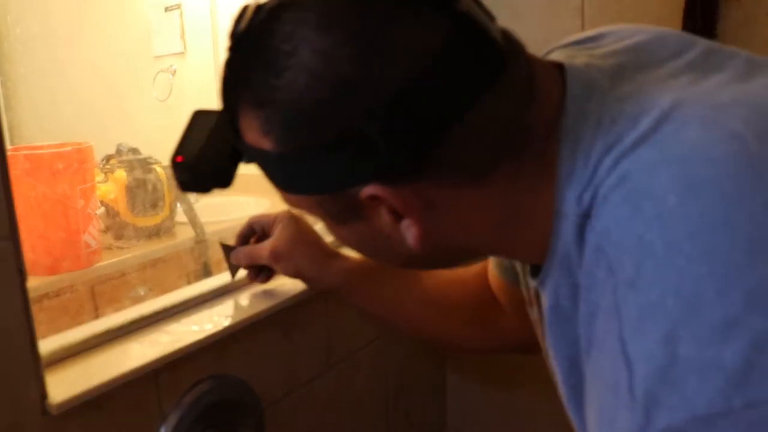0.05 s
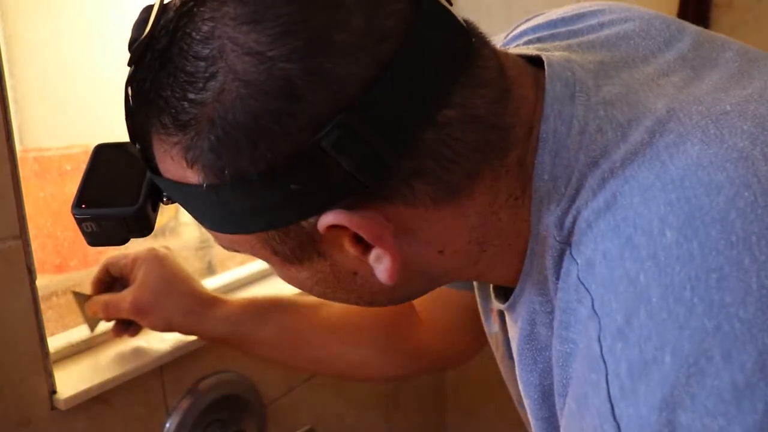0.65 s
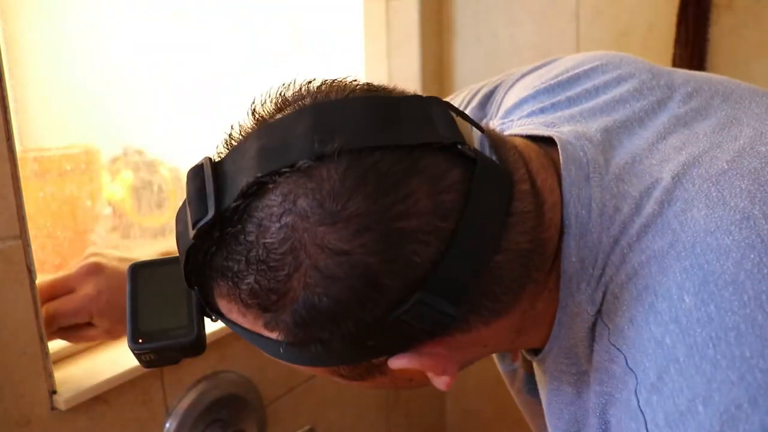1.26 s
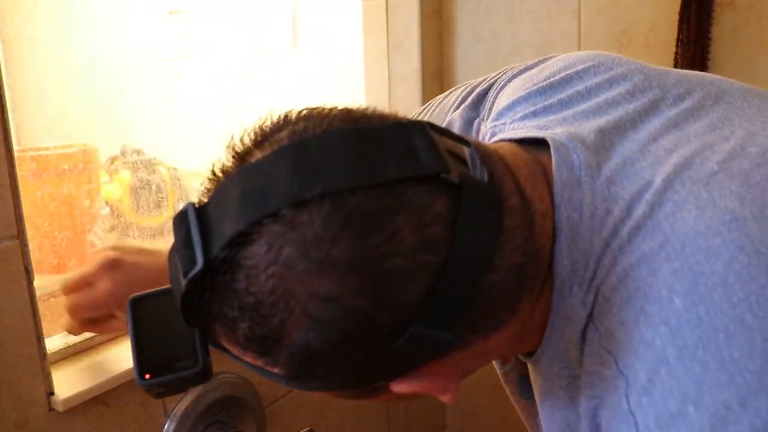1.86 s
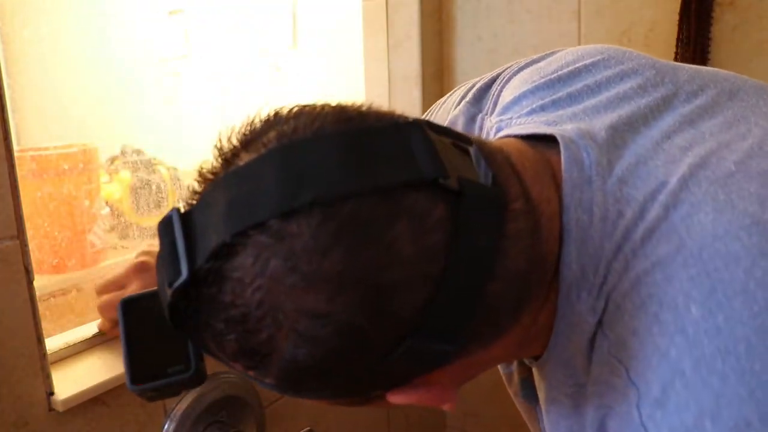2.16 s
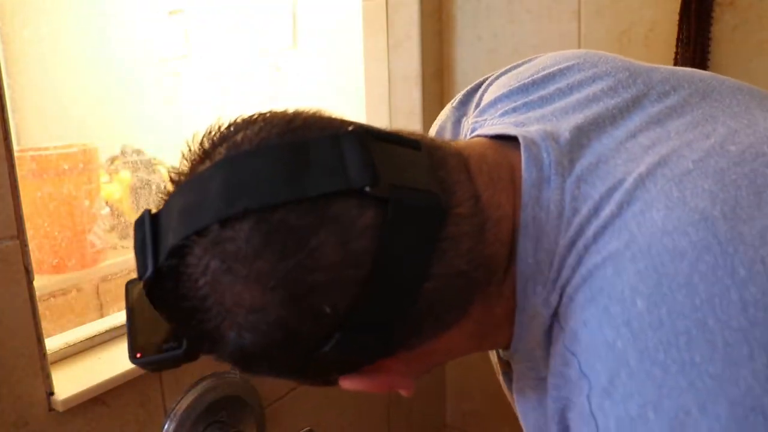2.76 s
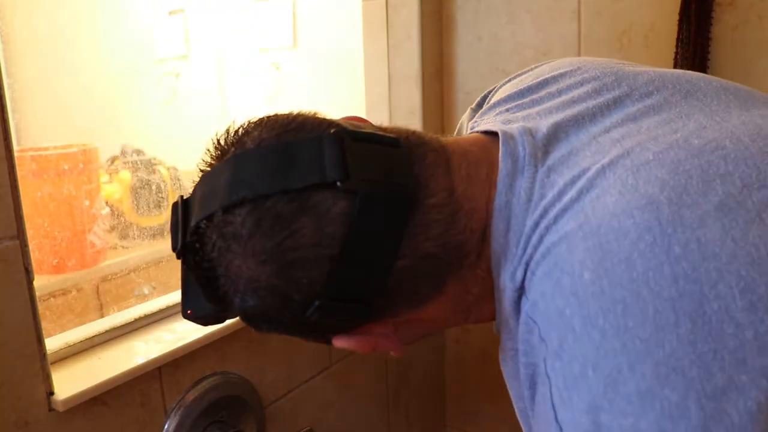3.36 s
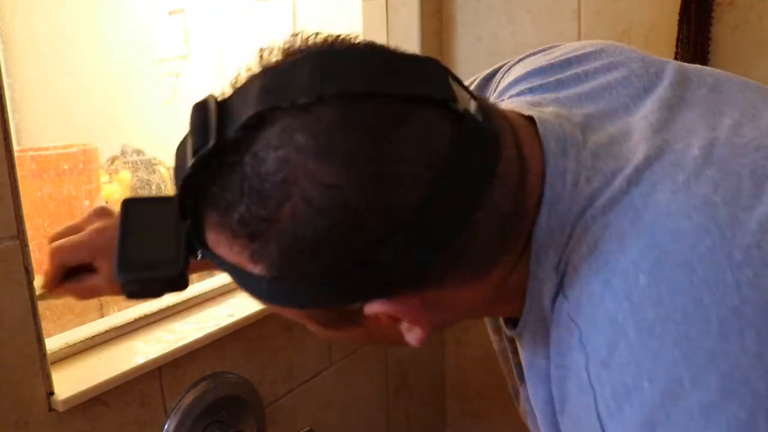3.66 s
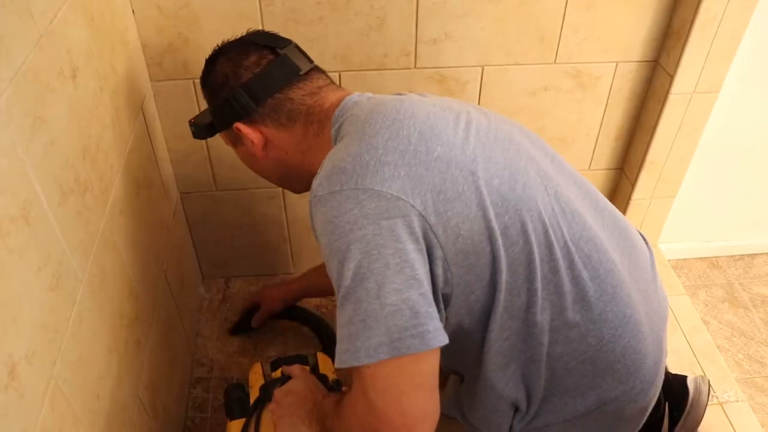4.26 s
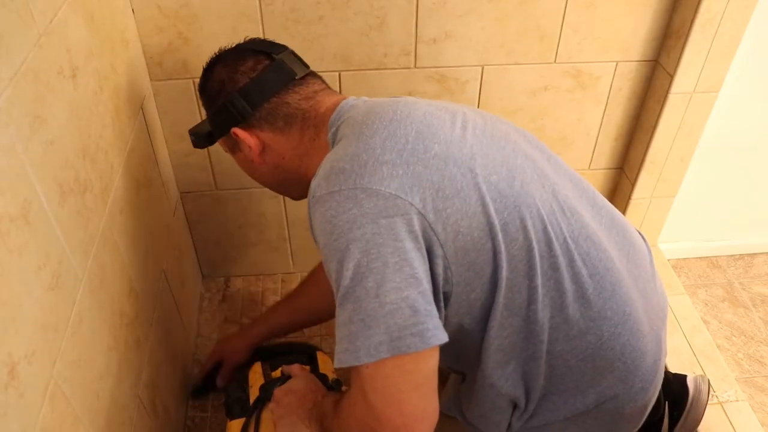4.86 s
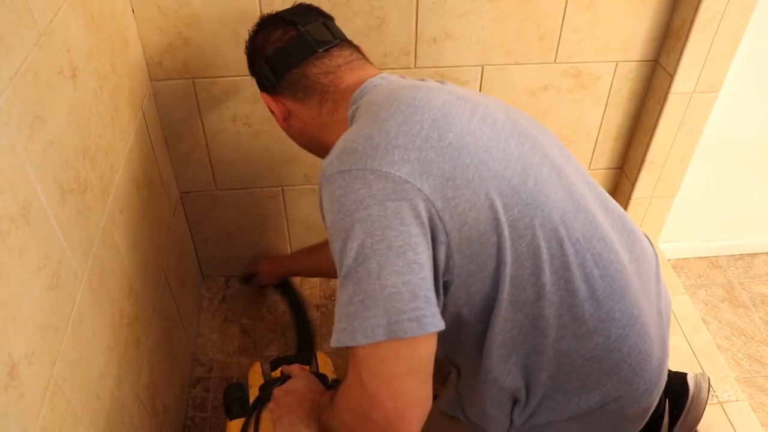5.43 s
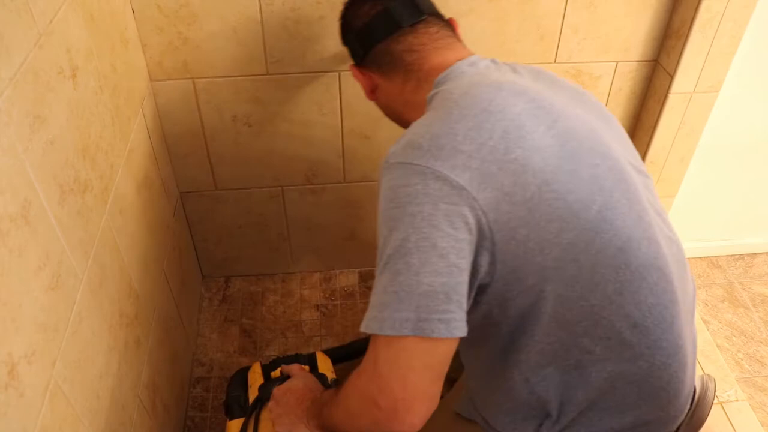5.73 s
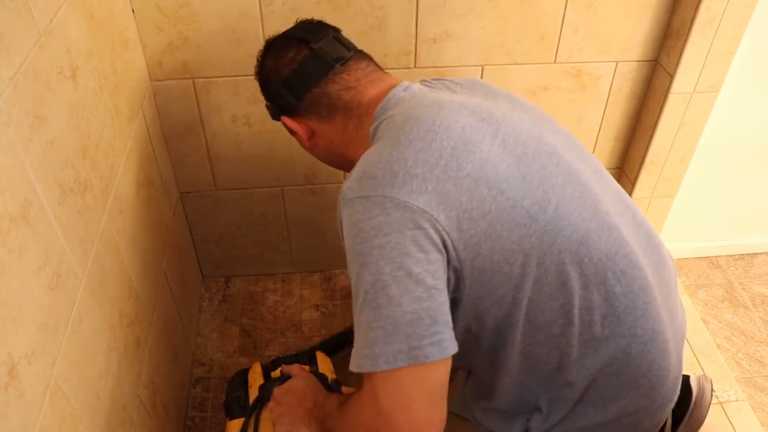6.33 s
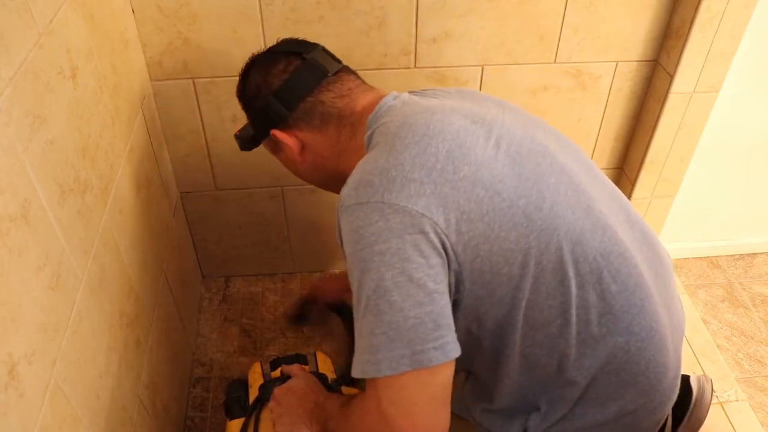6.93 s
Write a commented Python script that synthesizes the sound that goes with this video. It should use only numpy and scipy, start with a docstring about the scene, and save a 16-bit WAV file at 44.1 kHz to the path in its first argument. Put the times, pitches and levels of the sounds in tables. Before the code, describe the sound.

A steel hand scraper works a grout joint in a small tiled shower, close to the microphone, over faint room noise. It opens with one gritty, rasping drag lasting until about 0.9 seconds. From 1 second come short, sticking strokes with crisp chips and light metal clacks, the sharpest near 2.1 seconds. Between 2.4 and 3.5 seconds the blade judders and the wall panel knocks and chatters hollowly, with a few tiny squeaks around 3 seconds. At 3.9 seconds the scraping cuts abruptly to a loud cordless vacuum already running: roaring air, a bright hiss and a high motor whine. The whine lifts and the roar thins whenever the nozzle seals on the floor, around 4.3, 4.7 to 4.8 and 6.2 to 6.8 seconds. Sucked-up grit ticks faintly against plastic, with a sharper tick near 6.8 seconds. The vacuum runs on to the end at about 7 seconds.

```python
"""A small tiled shower, one microphone close to the work. A steel hand scraper follows a grout joint:
one long gritty drag, then short sticking strokes whose slips chip the grout and shake the wall panel.
The scene changes abruptly to a cordless vacuum: air roars in its hose and hisses from its exhaust,
the motor whines higher whenever the nozzle chokes on the floor, and sucked-up grit ticks on plastic."""
import sys
import numpy as np
from scipy import signal
from scipy.fft import rfft, irfft, next_fast_len
from scipy.io import wavfile
from scipy.ndimage import uniform_filter1d, map_coordinates

SR = 44100
rng = np.random.default_rng(int(sys.argv[2]) if len(sys.argv) > 2 else 0)


def bounce(signal):
    """Save signal as a 16-bit WAV file at the path given by the first command-line argument."""
    frames = np.transpose(np.atleast_2d(signal))
    limited = np.clip(frames, -1, 1)
    pcm = np.round(limited * 32767).astype(np.int16)
    wavfile.write(sys.argv[1], SR, pcm)


N = 312669
VACUUM_START_S = 3.9072
USUAL_CHIP_DB, SCRAPE_DRIFT_DB = -17, 1.7

# Pushes of the blade along the joint. Each row: start and length in seconds, then relative levels
# in dB of grit, rasp, low panel groan and hollow panel chatter.
STROKES = [(-0.02, 0.022, -39, -38, -65, -70), (0.13, 0.12, -42.5, -47, -67, -70),
           (0.256, 0.14, -37, -38, -40.5, -54), (0.425, 0.19, -33.5, -35.5, -35.5, -50),
           (0.607, .13, -38.5, -28, -36, -40.5), (0.749, 0.028, -45, -32.5, -39, -50),
           (0.802, 0.075, -36, -31.5, -39, -43), (1.105, 0.16, -38.5, -54, -54, -66),
           (1.416, 0.12, -37, -42.5, -50.5, -51), (1.6, 0.38, -38.5, -52, -54, -64),
           (1.943, 0.41, -37.5, -45, -51, -48), (2.445, 0.38, -33, -48, -54, -41.5),
           (2.896, .31, -33, -46, -47, -48), (3.238, 0.3, -38, -46, -43, -43),
           (3.786, 0.077, -41, -49, -54, -65)]
# The sticking blade slips, about every 50 ms in a hard stroke.
# Each row: time in seconds, relative levels in dB of the chip and the panel knock.
SLIPS = [(0.3774, -26, -44), (0.6244, -43, -32), (0.726, -23, -46), (0.807, -24, -40), (1.2155, -18.5, -41),
         (1.296, -26, -61), (1.4887, -17.5, -41), (1.694, -20.5, -62), (1.708, -18, -59),
         (1.799, -20.5, -61), (1.9517, -19, -40.5), (2.0123, -17.5, -44), (2.068, -21, -49),
         (2.1058, -5, -34.5), (2.1219, -10.5, -28), (2.1743, -11.5, -39.5), (2.23, -12, -35),
         (2.2697, -13.5, -42), (2.2849, -16.5, -31), (2.4588, -12, -45), (2.5194, -13, -24),
         (2.5754, -15.5, -28), (2.6223, -21, -40), (2.6698, -21.5, -40), (2.725, -17, -30),
         (2.7738, -15.5, -27.5), (2.8209, -23, -36), (2.9222, -21, -28.5), (2.9798, -19, -22.5),
         (3.035, -20, -26), (3.0884, -11.5, -22), (3.1347, -15.5, -32), (3.1907, -26, -34.5),
         (3.243, -23.5, -45), (3.2915, -24.5, -25), (3.3751, -39, -30.5), (3.4631, -33, -27),
         (3.5062, -24.5, -37), (3.5384, -31, -32)]
# The colour of crumbling grout. Each row: frequency in Hz, relative level in dB.
GROUT_SPECTRUM = [(2000, -21), (4000, -14.5), (4800, -8), (5600, -14.5), (6400, -5.5), (7800, 2.5),
                  (8700, -2.5), (10000, -0.5), (11400, 2.5), (12500, -4.5), (13300, -1.5), (14200, -4),
                  (15800, -3)]
# The ring of blade and tile. Each row: frequency and width in Hz, gain in dB.
BLADE_MODES = [(1580, 68, -5), (1890, 66, -4), (2130, 70, -2), (2610, 84, -4), (2900, 70, -3),
               (3360, 45, 0), (4780, 60, -9)]
# The nozzle seals against the floor. Each row: middle and half length in seconds,
# depth up to 1 (below 0 it is lifted clear).
CHOKES = [(3.86, 0.074, 0.92), (4.0, 0.024, 0.44), (4.1, 0.0278, -.2), (4.18, 0.014, 0.82),
          (4.27, 0.033, 0.85), (4.665, .07, 0.79), (4.82, 0.055, 0.92), (5.01, 0.028, 0.11),
          (5.16, 0.03, 0.44), (5.27, 0.0517, -0.168), (5.43, 0.083, 0.12), (6.23, 0.055, .55),
          (6.44, 0.094, 0.9), (6.54, 0.027, 0.42), (6.65, 0.025, 0.63), (6.82, 0.19, 0.27)]


def amp(db):
    """Decibels to gain."""
    return 10 ** (np.asarray(db) / 20)


def unit(x):
    """Scale to rms 1."""
    return x / np.sqrt(np.mean(x ** 2) + 1e-20)


def along(points, hz):
    """Read (Hz, value) points on a log frequency axis."""
    points_hz, values = np.transpose(points)
    return np.interp(np.log(hz + 1), np.log(points_hz + 1), values)


def wobble(rate):
    """A smooth random curve, rate knots a second."""
    knots = rng.standard_normal(int(N * rate / SR) + 4)
    return map_coordinates(knots, [np.arange(N) * rate / SR])


def humps(rows):
    """A smooth hump for each row of middle in seconds, half length in seconds and height."""
    t = np.arange(N) / SR
    return sum(height * np.exp(-((t - s) / half) ** 2) for s, half, height in rows)


def add(track, s, sound):
    """Mix a sound into the track at s seconds."""
    start = max(round(s * SR), 0)
    track[start:start + len(sound)] += sound[:max(len(track) - start, 0)]


def filtered(x, response):
    """Pass x through a complex response of frequency."""
    size = 2 * next_fast_len((len(x) + SR // 2) // 2)
    return irfft(rfft(x, size) * response(np.fft.rfftfreq(size, 1 / SR)), size)[:len(x)]


def coloured(x, spectrum):
    """Pass x through a causal filter with the given (Hz, dB) shape."""
    def minimum_phase(hz):
        cepstrum = irfft(np.log(amp(along(spectrum, hz))))
        half = len(cepstrum) // 2
        cepstrum[1:half] *= 2
        cepstrum[half + 1:] = 0
        return np.exp(rfft(cepstrum))
    return filtered(x, minimum_phase)


def passband(x, spectrum):
    """Colour x while keeping the power of a white input."""
    power = np.mean(amp(along(spectrum, np.linspace(0, SR / 2, 2048))) ** 2)
    return coloured(x, spectrum) / np.sqrt(power)


def resonate(x, modes):
    """Pass x through a set of (Hz, width in Hz, dB) resonances."""
    def response(f):
        return sum(amp(db) * 1j * f * width / (hz * hz - f * f + 1j * f * width)
                   for hz, width, db in modes)
    return filtered(x, response)


def low_cut(x, edge_hz, order):
    """Roll off what lies below the edge."""
    return signal.sosfilt(signal.butter(order, edge_hz, "highpass", fs=SR, output="sos"), x)


def grains(rate, spread_db):
    """Tiny random impulses of uneven size, rate a second, at rms 1."""
    present = rng.random(N) < rate / SR
    impulses = present * rng.standard_normal(N)
    return unit(impulses * amp(spread_db * np.minimum(rng.exponential(size=N), 4)))


def bursts(times, levels_db, rise, fall, delay, tilts_db=0):
    """A puff of fracture noise at each time, tilted by so many dB an octave around 9 kHz."""
    track, t = np.zeros(N), np.arange(SR // 10) / SR
    octaves = np.log2(np.maximum(np.fft.rfftfreq(len(t), 1 / SR), 4500) / 9000)
    for s, db, attack, tilt in np.broadcast(times, levels_db, rise, tilts_db):
        shape = (1 - np.exp(-t / attack)) ** 2 * np.exp(-t / fall)
        noise = irfft(rfft(rng.standard_normal(len(t))) * amp(tilt * octaves), len(t))
        add(track, s + delay, amp(db) * shape / shape.max() * noise)
    return track


def stall(x, wet_db):
    """The microphone hears the direct sound plus the dense ring of the tiled walls, at equal total power."""
    # The decay of the shower. Each row: frequency in Hz, seconds to fall by 60 dB.
    decay_times = [(300, 0.21), (1300, 0.23), (3500, 0.15), (9000, 0.11), (15000, 0.043)]
    hz, t, spectra = signal.stft(rng.standard_normal(SR // 3), SR, nperseg=256)
    decay = amp(-60 * t / along(decay_times, hz)[:, None])
    tail = signal.istft(spectra * decay, SR, nperseg=256)[1]
    tail[:SR // 500] = 0  # the nearest wall answers after 2 ms
    echo = signal.fftconvolve(x, tail / np.linalg.norm(tail))[:len(x)]
    return (x + amp(wet_db) * echo) / np.hypot(1, amp(wet_db))


def shifting(x, depth_db, size):
    """A moving source meets new wall reflections: its colour drifts in patches of size (bins, frames)."""
    spectra = signal.stft(x, nperseg=512)[2]
    patches = rng.standard_normal(spectra.shape)
    for axis in (0, 1, 0, 1):
        patches = uniform_filter1d(patches, size[axis], axis)
    gain = amp(depth_db * unit(patches))
    return signal.istft(spectra * unit(gain), nperseg=512)[1][:N]


def room_tone():
    """Faint air noise and hum of the bathroom, behind the scraper."""
    # The air noise. Each row: frequency in Hz, relative level in dB.
    air_spectrum = [(20, -2), (35, -3), (55, -12), (85, -6), (130, -15), (300, -4), (900, -7), (2500, -8.5),
                    (5000, -12), (10000, -12), (15800, -16.5)]
    # The wavering hum. Each row: frequency in Hz, middle level in dB.
    hum_tones = [(91, -60.5), (181, -63), (743, -67), (899, -69.5), (1114, -67.5)]
    t = np.arange(N) / SR
    hum = sum(amp(db + 4.9 * wobble(5.2)) * np.sin(2 * np.pi * hz * t + 0.26 * wobble(8.2))
              for hz, db in hum_tones)
    return hum + amp(-52.5) * unit(coloured(rng.standard_normal(N), air_spectrum))


def debris():
    """Sucked-up grit ticks against the plastic nozzle, which bumps the floor once."""
    # Larger crumbs strike. Each row: time in seconds, relative level in dB.
    crumbs = [(4.112, -11), (5.823, -19), (5.893, -13), (6.815, -2), (6.901, -10)]
    # The bump. Each row: time in seconds, pitch in Hz, relative level in dB.
    bumps = [(4.69, 118.9, -45)]
    thuds, t = np.zeros(N), np.arange(SR // 5) / SR
    ticks = amp(-39) * grains(rate=190, spread_db=5)
    for s, db in crumbs:
        add(ticks, s, amp(db - 8) * np.exp(-t / 0.0014) * rng.standard_normal(len(t)))
    for s, hz, db in bumps:
        envelope = (1 - np.exp(-t / 0.0097)) * np.exp(-t / 0.03)
        add(thuds, s, amp(db) * envelope * np.sin(2 * np.pi * hz * t))
    plastic = passband(ticks, [(300, -15.5), (2000, 7), (9000, -15), (15000, -7.5)])
    return thuds + stall(plastic, wet_db=-4)


def whine():
    """Motor and impeller tones flutter in the air; a choke sheds load, so they rise, a little late."""
    # The tones. Each row: multiple of the shaft speed, relative level in dB, change in dB when choked.
    orders = [(2, -46.5, 0), (6, -42, 0), (10, -35, -5), (12, -48, 0), (14, -34.5, 6), (17, -37, 0),
              (20, -34.5, 9.5), (28, -47, 0), (29, -46, 0)]
    # The tone near 5 kHz swells. Each row: middle and half length in seconds, boost in dB.
    swells = [(4.51, .07, 4), (5.17, .08, 5.5), (5.9, .2, 6.5), (7.06, .06, 4)]
    free_hz, choked_rise_hz, battery_sag_hz_per_s = 510.8, 20.5, 0.6
    spin_up_s, swelling_order = 0.055, 10
    t, inertia = np.arange(N) / SR, np.exp(-1 / (spin_up_s * SR))
    unloaded = signal.lfilter([1 - inertia], [1, -inertia], humps(CHOKES))
    sag_hz = battery_sag_hz_per_s * (t - VACUUM_START_S)
    shaft_hz = free_hz + choked_rise_hz * np.maximum(unloaded, 0) ** 1.25 - sag_hz
    shaft_angle = 2 * np.pi * np.cumsum(shaft_hz * (1 + 0.0003 * wobble(90))) / SR
    tones = np.zeros(N)
    for order, db, choked_db in orders:
        level_db = db + 2.8 + choked_db * unloaded + (order == swelling_order) * humps(swells)
        tones += amp(level_db + 2 * wobble(12)) * np.sin(order * shaft_angle + 0.18 * wobble(60))
    return tones


def airflow():
    """Turbulence roars in the hose, rushes at the nozzle and hisses out; choking trades roar for hiss."""
    # Air resonances of hose and canister. Each row: frequency and width in Hz, relative level in dB.
    hose_modes = [(240.8, 4.9, -4.5), (335, 6.1, -10.5), (387, 19, -14), (458.3, 11.3, 1.5), (523, 4, 2),
                  (610, 2.8, -24), (641.5, 16.5, 4.5), (764, 29, 1), (830, 26, -2), (860, 22.6, 5.5),
                  (964, 67, -4.5), (1025, 15.4, 6.5), (1130, 31, -4.5), (1310, 22, -4.5)]
    # Narrow whistles in the air stream. Each row: frequency and width in Hz, relative level in dB.
    whistle_modes = [(2025, 36, -5), (3033, 13, -9), (3250, 29, 4), (3460, 60, -17), (3973, 17, 1.5)]
    # The colours of nozzle and exhaust. Each row: frequency in Hz, relative level in dB.
    nozzle_spectrum = [(30, -50), (160, -21), (300, -17.5), (700, -1), (1100, -9), (1550, 1.5),
                       (1850, -0.5), (2350, -3), (2700, 2.5), (2920, -5), (3200, 3.5), (3520, 4.5),
                       (3800, -0.5), (5400, -2), (9000, -17)]
    exhaust_spectrum = [(3500, -65), (5400, -7.5), (6000, 2.5), (6800, -1), (7450, 6), (7950, 3),
                        (8750, 7.5), (10000, 4), (11300, 4), (12150, -4.5), (12900, 4), (14000, 0),
                        (15000, 7.5), (15600, -4), (15900, -24)]
    # The nozzle slurps as it lifts. Each row: middle and half length in seconds, boost in dB.
    slurps = [(4.55, .02, 1), (4.91, .02, 2.5), (5.08, 0.046, 3.5)]
    choke = humps(CHOKES)
    hose = low_cut(resonate(rng.standard_normal(N), hose_modes), 237, order=6)
    nozzle = stall(coloured(rng.standard_normal(N), nozzle_spectrum), wet_db=-5.5)
    nozzle = shifting(nozzle, depth_db=2.13, size=(2, 22))
    exhaust = stall(coloured(rng.standard_normal(N), exhaust_spectrum), wet_db=-6)
    exhaust = shifting(exhaust, depth_db=1, size=(2, 24))
    whistles = sum(amp(3.2 * wobble(5)) * resonate(rng.standard_normal(N), [mode])
                   for mode in whistle_modes)
    whistles = amp(-12.5 + 8 * choke) * unit(whistles)  # a narrow gap whistles more
    roar = amp(-23.5 - 10 * choke + 0.37 * wobble(22)) * unit(hose)
    rush = amp(-25 - choke + humps(slurps) + 0.7 * wobble(18)) * (unit(nozzle) + whistles)
    hiss = amp(-19.5 + 2 * choke + 0.8 * wobble(25)) * unit(exhaust)
    return roar + rush + hiss


def panel(force):
    """The wall panel rings, ever more hollow as the blade nears the belly of its strongest mode."""
    # The panel's resonances. Each row: frequency and width in Hz, gain in dB.
    panel_modes = [(94, 7, -4), (115.6, 7.8, -3), (192.7, 9.5, -8), (237, 28, -11), (311, 14, 7.5),
                   (382, 26, -11.5), (447, 14, -10), (527.4, 24, -4), (707.5, 16, -5.5), (890, 8.4, -2.5),
                   (1132, 10, -8), (1260, 8.2, -16), (1790, 44, -18)]
    growth_db_per_s, even_at_s = 4.5, 3.3
    strongest = max(panel_modes, key=lambda mode: mode[2])
    hollow_gain = amp(np.clip(growth_db_per_s * (np.arange(N) / SR - even_at_s), -9, 4))
    hollow = resonate(force * (hollow_gain - 1), [strongest])
    return low_cut(resonate(force, panel_modes) + hollow, 81, order=5)


def chirps():
    """For a short run of slips near three seconds, the edge gives brief falling squeals."""
    start_hz, fall_hz_per_s, length_s = 1727, 11000, 0.024
    from_s, until_s = 2.76, 3.16
    track, t = np.zeros(N), np.arange(round(length_s * SR)) / SR
    chirp = np.hanning(len(t)) * np.sin(2 * np.pi * (start_hz - fall_hz_per_s * t / 2) * t)
    for s, _, knock_db in SLIPS:
        if from_s < s < until_s:
            add(track, s - length_s / 5, amp(knock_db - 10.5) * chirp)
    return stall(track, wet_db=-4)


def squeak():
    """The blade squeaks once and a tile sings on."""
    # Each row: time in seconds, pitch in Hz, relative level in dB.
    squeaks = [(2.812, 905, -33.5)]
    track, t = np.zeros(N), np.arange(SR // 3) / SR
    envelope = (1 - np.exp(-t / 0.022)) ** 2 * np.exp(-t / 0.023)
    for s, hz, db in squeaks:
        add(track, s, amp(db + 11.5) * envelope * np.sin(2 * np.pi * hz * t))
    return track


def knocks():
    """The blade stops dead after a slip: one soft push and a short rattle shake the wall panel."""
    times, _, knock_db = np.transpose(SLIPS)
    pushes, pulse = np.zeros(N), np.hanning(round(0.0016 * SR))
    for s, db in zip(times, knock_db):
        add(pushes, s + 0.0021, amp(db + 47.5) * pulse / pulse.sum())
    rattle = bursts(times, knock_db + 17.5, rise=0.0041, fall=0.022, delay=-0.002)
    hand_cushion = [(1700, -1.0), (2400, -1.5), (4000, -7), (8000, -45)]
    return panel(coloured(pushes + rattle, hand_cushion))


def contacts():
    """Light landings and pressed slips. Each row: seconds, chip dB, clack dB, pressure from 0 to 1."""
    # The blade is set down on the tile. Each row: time in seconds, relative chip and clack levels in dB.
    landings = [(1.0642, -24, -32.5), (1.115, -17, -35), (1.1938, -20, -31.5), (1.585, -8, -43),
                (2.392, -7.5, -27.5), (3.7547, -11, -31.5), (3.8405, -25, -33)]
    rows = [(s, chip_db, clack_db, 0) for s, chip_db, clack_db in landings]
    starts, _, _, rasp_db, *_ = np.transpose(STROKES)
    for s, chip_db, knock_db in SLIPS:
        # the clack follows the rasp of its stroke and grows with the chip
        clack_db = rasp_db[starts <= s][-1] + 4.5 + 0.53 * (chip_db - USUAL_CHIP_DB)
        pressure = np.clip((knock_db + 42) / 22, 0, 1)
        rows.append((s, chip_db, clack_db, pressure))
    return rows


def chipping():
    """Each contact chips grout and clacks the steel; a hard-pressed blade grinds in, a light one ticks."""
    times, chip_db, clack_db, pressure = np.transpose(contacts())
    tilt_db = 0.2 * (chip_db - USUAL_CHIP_DB) - 0.6  # louder chips are brighter
    chips = bursts(times, chip_db - 4.5,
                   rise=0.00039 + 0.0011 * pressure, fall=0.0032, delay=-0.0012, tilts_db=tilt_db)
    crumbling = bursts(times - 0.009 * pressure, chip_db - 22 + 5 * pressure,
                       rise=0.0058, fall=0.018, delay=0)
    clacks = bursts(times, clack_db - 1 - 2 * pressure,
                    rise=0.00047 + 0.014 * pressure, fall=0.0064, delay=-0.0005)
    # Steel striking tile. Each row: frequency in Hz, relative level in dB.
    clack_spectrum = [(500, -23), (1000, -11.5), (2150, 2.5), (3300, 3.5), (4800, -2.5), (7000, 6),
                      (12000, -42)]
    direct = passband(chips + crumbling, GROUT_SPECTRUM) + passband(clacks, clack_spectrum)
    ring = amp(4) * resonate(clacks, BLADE_MODES)
    return shifting(stall(direct, wet_db=0), depth_db=SCRAPE_DRIFT_DB, size=(3, 12)) + ring


def stroke_gains():
    """Each stroke bites, holds and lets go: gains of grit, rasp, groan and chatter."""
    attack_s, release_s = 0.0047, 0.025
    t, gains = np.arange(N) / SR, 0
    for s, length, *levels_db in STROKES:
        bite = 1 - np.exp(-np.maximum(t - s, 0) / attack_s)
        release = np.exp(-np.maximum(t - s - length, 0) / release_s)
        gains = gains + np.outer(amp(levels_db), bite * release)
    return gains


def scraping():
    """The sliding blade crushes grains; their jolts ring the steel and make the panel groan and chatter."""
    # Steel dragged over tile. Each row: frequency in Hz, relative level in dB.
    rasp_spectrum = [(300, -27), (550, 2), (750, -8), (900, 7), (1050, 0.5), (1600, -3.5), (2100, -6),
                     (2400, -3.5), (2900, -4.5), (3400, -7), (4000, -1), (7000, -3), (12000, -11)]
    # The rubbed panel's lowest modes. Each row: frequency and width in Hz, relative level in dB.
    groan_modes = [(97, 6.1, -25), (109.1, 2.15, 11.5), (188.6, 5, -17), (234, 28, -20), (297, 19, -10),
                   (344, 37, -10), (531, 73, -12.5), (690, 63, -9), (830, 12, -15)]
    grit_gain, rasp_gain, groan_gain, chatter_gain = stroke_gains()
    catch = amp(2.3 * wobble(90))  # the edge catches and frees itself
    grit = amp(-5.5) * grit_gain * catch * passband(grains(rate=4200, spread_db=2.5), GROUT_SPECTRUM)
    jolts = grains(rate=2000, spread_db=1.0)
    rasp = amp(-10.5) * rasp_gain * catch * passband(jolts, rasp_spectrum)
    ring = amp(-11) * rasp_gain * unit(resonate(catch * jolts, BLADE_MODES))
    rubbing = resonate(grains(rate=1000, spread_db=-1.5), groan_modes)
    groan = amp(-5) * groan_gain * unit(low_cut(rubbing, 93, order=4))
    chatter = chatter_gain * unit(panel(grains(rate=280, spread_db=1.7)))  # tiny slips
    scrape = shifting(stall(grit + rasp, wet_db=5), depth_db=SCRAPE_DRIFT_DB, size=(3, 14))
    return scrape + ring + groan + chatter


def scene():
    """Scraping gives way at once to the running vacuum; the one microphone feeds both channels."""
    vacuum_on = np.clip((np.arange(N) / SR - VACUUM_START_S) / 0.001, 0, 1)
    scraper = scraping() + chipping() + knocks() + squeak() + chirps() + room_tone()
    vacuum = airflow() + whine() + debris()
    mono = (1 - vacuum_on) * scraper + vacuum_on * vacuum
    return np.array([mono, mono])


def record(dry):
    """The microphone's signal is cut off steeply at the top of its band."""
    top_hz = 15900
    return np.array([filtered(x, lambda hz: 1 / np.sqrt(1 + (hz / top_hz) ** 300)) for x in dry])


dry = scene()
out = record(dry)
bounce(out)
```